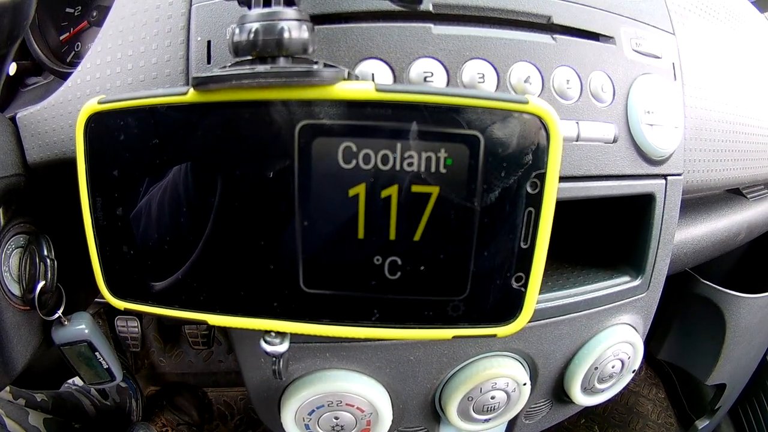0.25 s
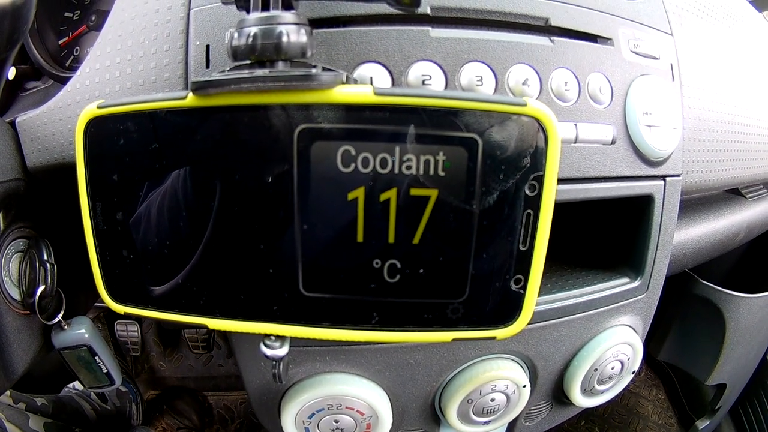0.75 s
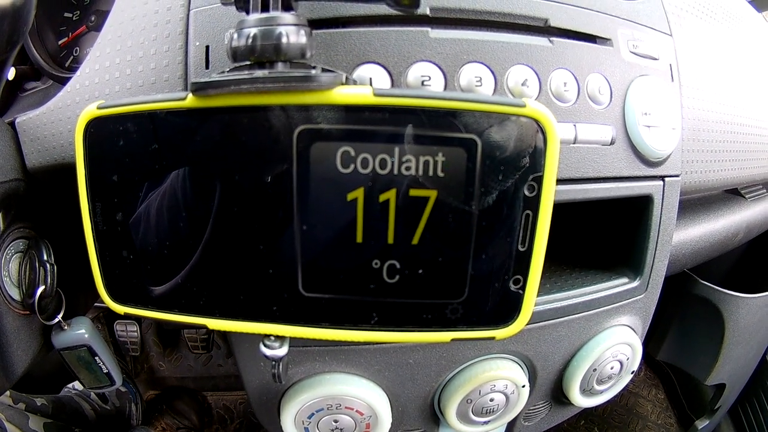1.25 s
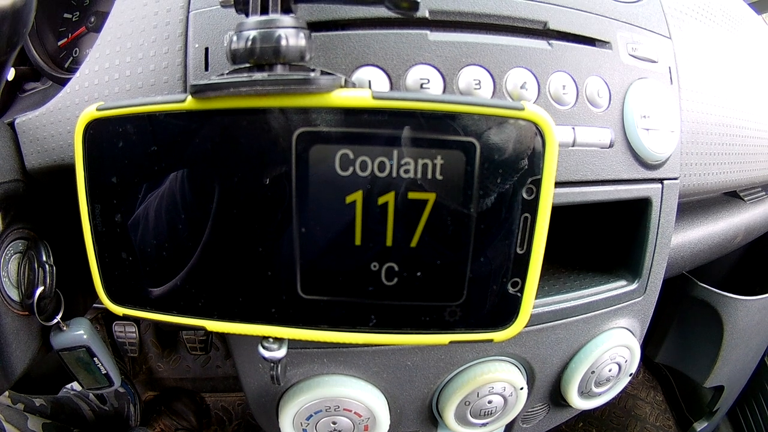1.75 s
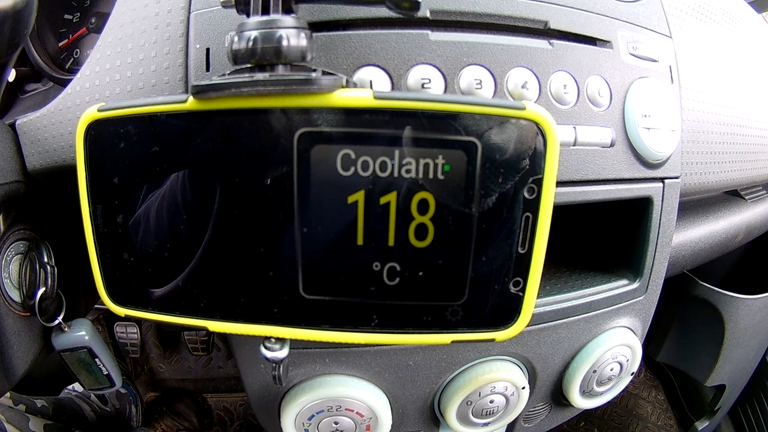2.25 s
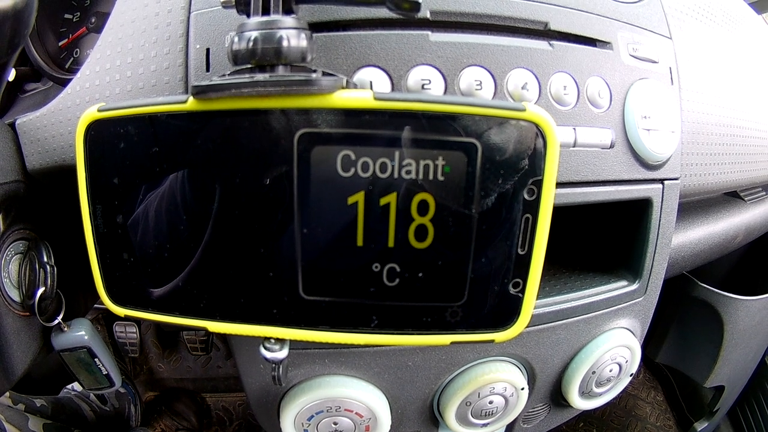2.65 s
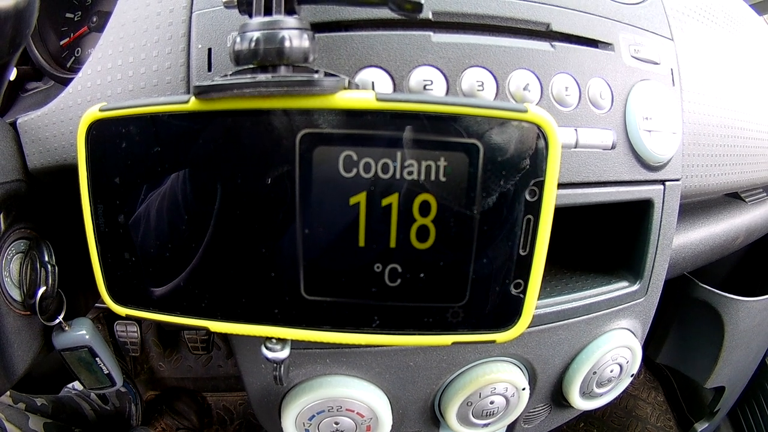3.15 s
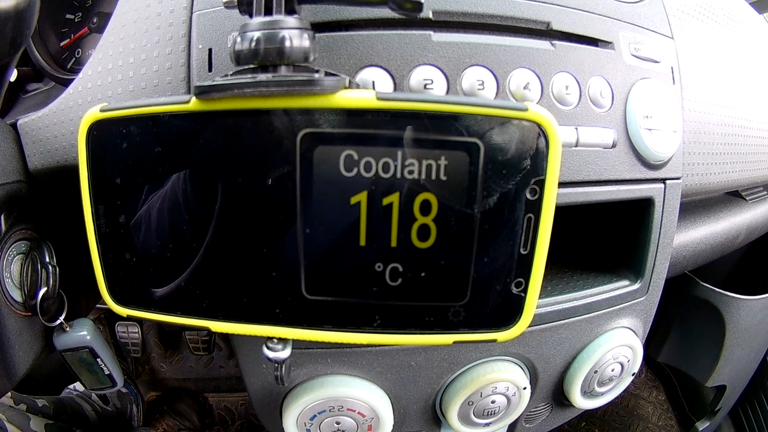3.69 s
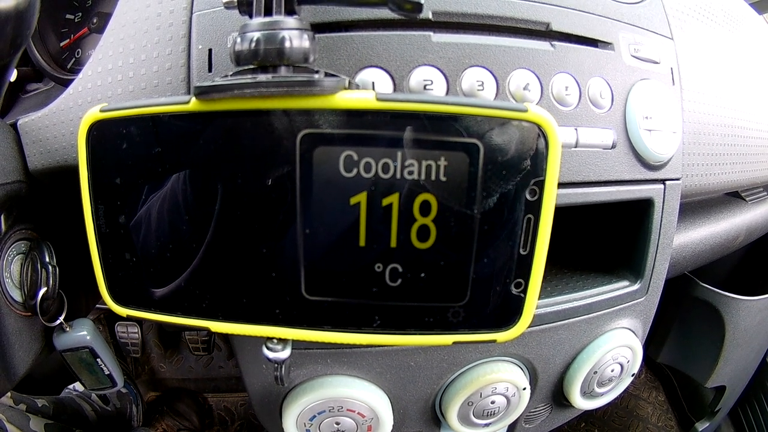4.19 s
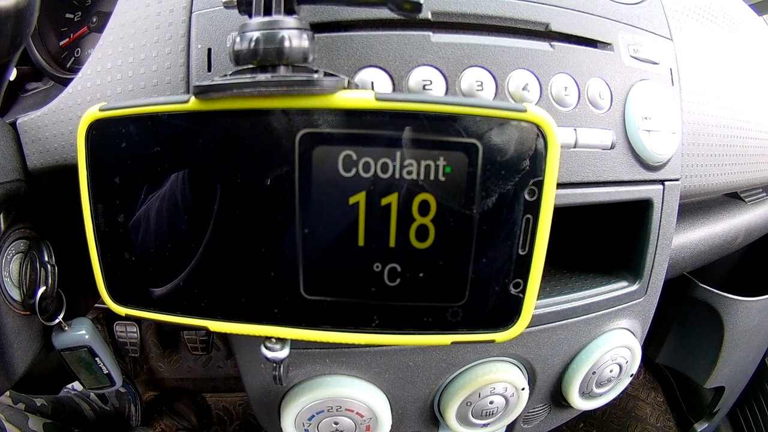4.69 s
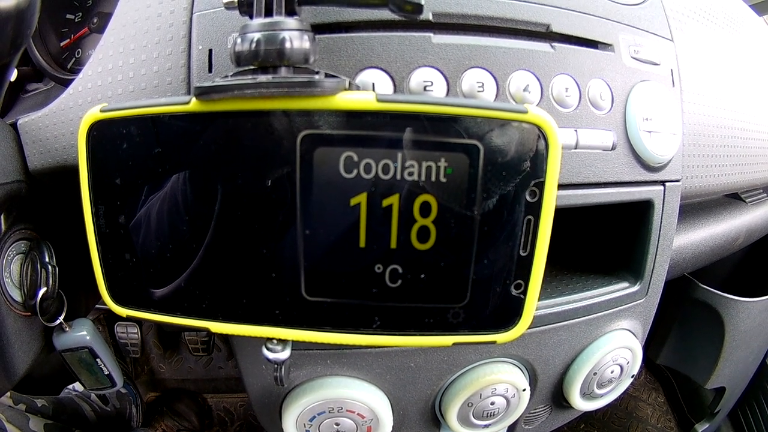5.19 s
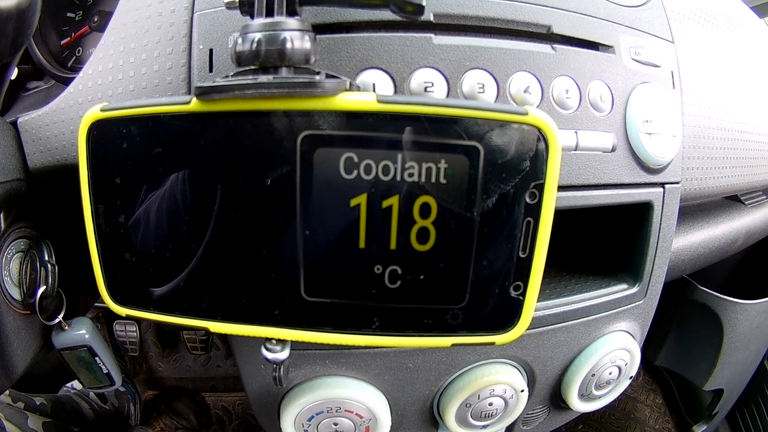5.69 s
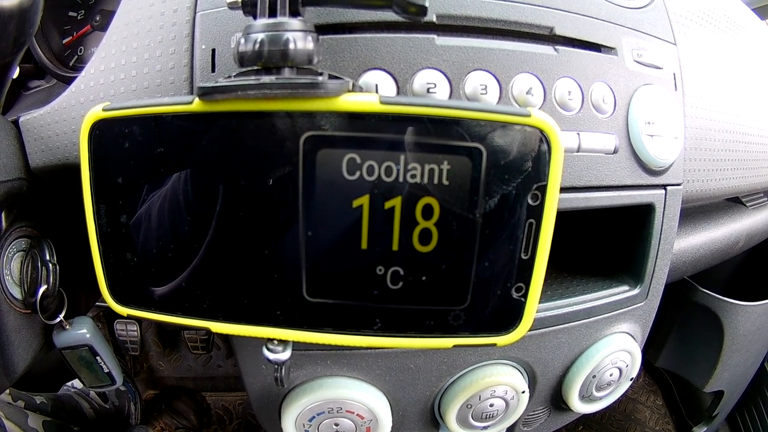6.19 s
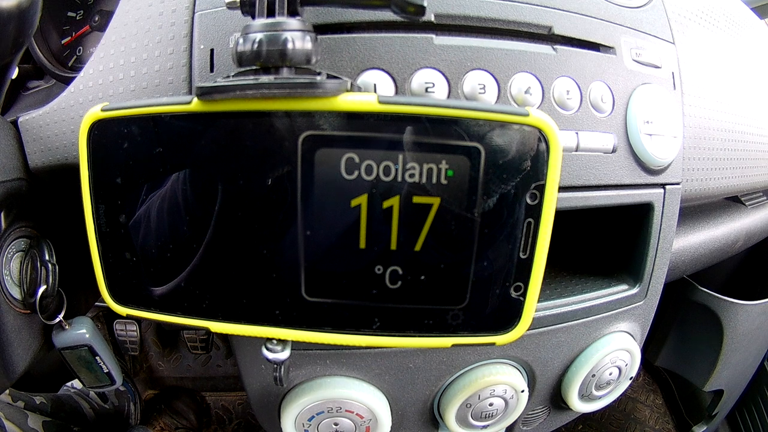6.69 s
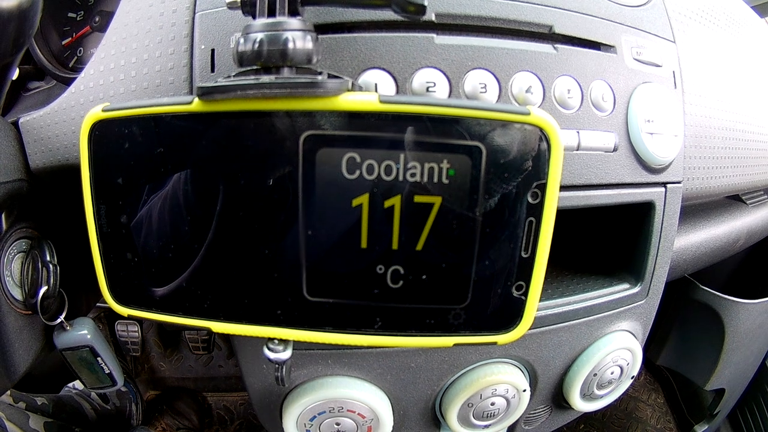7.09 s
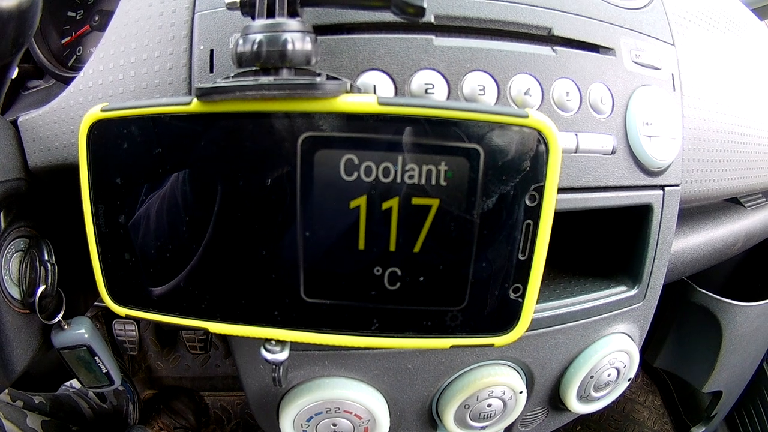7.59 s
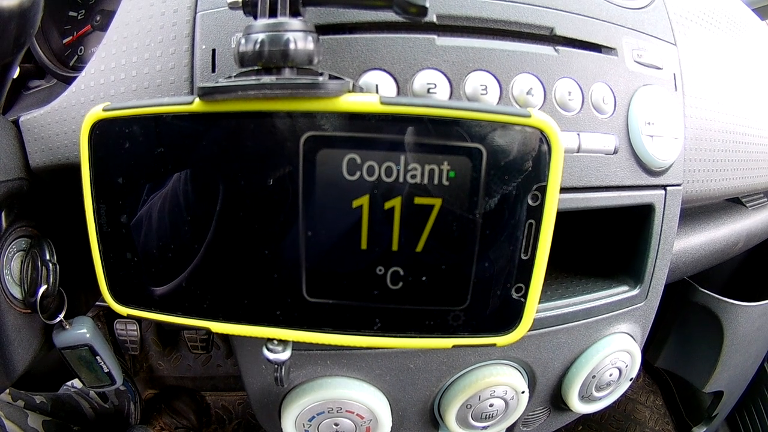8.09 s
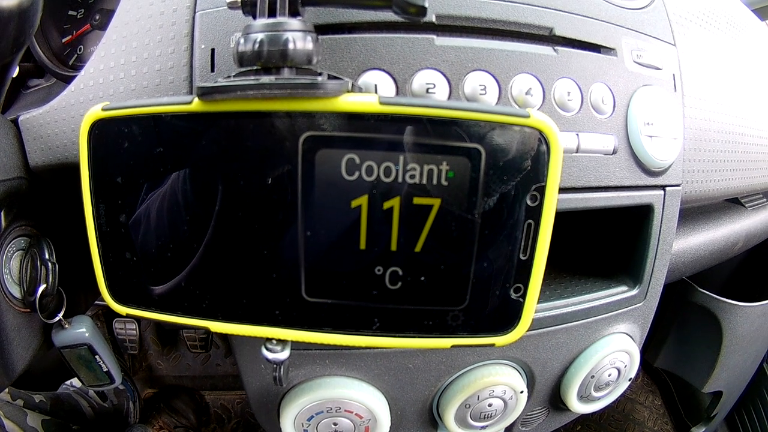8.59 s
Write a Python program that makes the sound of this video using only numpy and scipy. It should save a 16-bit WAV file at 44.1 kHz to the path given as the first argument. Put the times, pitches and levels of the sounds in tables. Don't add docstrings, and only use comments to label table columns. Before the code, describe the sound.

Inside a closed, parked car, the heater fan is already at full speed. Muffled air rushes steadily through ducts and vents over a strong, low, slightly wavering hum from the unbalanced fan wheel. Deep irregular buffeting trembles beneath, and the engine idles very faintly. The close dashboard microphone sounds dull and bassy, with a trace of high hiss. Nothing starts or stops until the abrupt end.

```python
import sys
import numpy as np
from scipy import signal
from scipy.fft import rfft, irfft, next_fast_len
from scipy.io import wavfile

SR = 44100
rng = np.random.default_rng(int(sys.argv[2]) if len(sys.argv) > 2 else 0)


def volts(x):
    e = np.asarray(x, float) / 20
    return 10 ** e


def to_wav(s):
    ch = np.atleast_2d(s).T
    pcm = np.round(np.clip(ch, -1, 1) * 32767)
    wavfile.write(sys.argv[1], SR, pcm.astype(np.int16))


N = 390285
TIME_S = np.arange(N) / SR


def rms_one(x):
    return x / np.sqrt(np.mean(x ** 2) + 1e-20)


def drift(rate_hz):
    knots = rng.standard_normal(600)
    return rms_one(np.interp(TIME_S * rate_hz, np.arange(len(knots)), knots))


def coloured(white, spectrum, modes=()):
    size = next_fast_len(N)
    hz = np.maximum(np.arange(size // 2 + 1) * SR / size, 1)
    points_hz, points_db = np.transpose(spectrum)
    level_db = np.interp(np.log(hz), np.log(points_hz), points_db)
    for centre_hz, width_hz, mode_db in modes:
        level_db += mode_db / (1 + (2 * (hz - centre_hz) / width_hz) ** 2)
    shaped = irfft(rfft(white, size) * volts(level_db), size)
    return rms_one(shaped[:N])


def microphone_hiss():
    # (frequency [Hz], level [dB per Hz])
    hiss_spectrum = [(3000, -30), (5500, -7.5), (6900, -0.5), (7900, -4), (8900, -1.5), (10000, -3),
                     (12000, -3.5), (13500, -2), (14500, -2), (15700, 0), (17000, 0.5)]
    return volts(-78) * coloured(rng.standard_normal(N), hiss_spectrum)


def engine():
    # (frequency [Hz], level [dB rms])
    idle_tones = [(25.2, -54), (48.3, -50)]
    angle = 2 * np.pi * np.cumsum(1 + 0.015 * drift(1.5)) / SR
    hum = np.zeros(N)
    for hz, level_db in idle_tones:
        strength = np.sqrt(2) * volts(level_db + 3 * drift(2.5))
        hum += strength * np.sin(hz * angle)
    return hum


def cabin_buffeting(load_db):
    # (frequency [Hz], level [dB per Hz])
    buffet_spectrum = [(12, -32), (20, -22), (28, -14), (41, -10), (48, -3), (55, -3.5), (61, 1), (70, -2),
                       (80, -9), (94, -12), (106, -22), (140, -40), (600, -140)]
    level_db = -34 + 1.05 * load_db
    return volts(level_db) * coloured(rng.standard_normal(N), buffet_spectrum)


def air_rush(load_db):
    # (frequency [Hz], level [dB per Hz])
    rush_spectrum = [(20, -11.5), (90, 0.5), (200, -4.5), (450, -3.5), (900, -12), (1500, -20), (2500, -29),
                     (3500, -36.5), (4500, -37.5), (5800, -48.5), (6500, -61.5), (7500, -75.5), (9000, -98),
                     (16000, -130)]
    # (centre [Hz], width [Hz], change [dB])
    duct_modes = [(114, 27, -3), (159.4, 51, 4.5), (204, 11, 3.5), (218, 22, -5), (237.4, 22, -5.5),
                  (267, 31, 6), (343.5, 70, -6.5), (429, 40, 3), (469, 50, 3), (540, 40, -1.5),
                  (580, 40, 2), (631, 50, -5.5), (723, 79, 4.5), (1056, 100, 3), (1125, 80, -4),
                  (1386, 53, -5), (1576, 120, 6), (1743, 74, -4.5), (1873, 43, 4.5), (2200, 70, 2.5),
                  (2420, 220, 4.5), (2705, 190, 5.5), (2813, 170, -4), (3065, 210, 5.5), (3240, 86, -2.5),
                  (3450, 120, -7.5), (3720, 130, 1), (4280, 150, 3), (4880, 220, -4), (4940, 150, 0.5),
                  (5460, 220, -1)]
    flicker_db = 0.16 * drift(9.7) + 0.35 * drift(40.0)
    turbulence = rng.standard_normal(N) * volts(flicker_db)
    level_db = -31 + 0.36 * load_db
    return volts(level_db) * coloured(turbulence, rush_spectrum, duct_modes)


def fan_wheel(load_db):
    # (multiple of the turn rate [-], level [dB])
    wheel_orders = [(1, 0), (2, -22), (5, -28)]
    mean_hz, hunt_hz, hunt_period_s, fastest_at_s = 73.95, 0.14, 7.0, 6.0
    hunt = np.cos(2 * np.pi * (TIME_S - fastest_at_s) / hunt_period_s)
    angle = 2 * np.pi * np.cumsum(mean_hz + hunt_hz * hunt) / SR
    hum = sum(volts(order_db) * np.cos(order * angle) for order, order_db in wheel_orders)
    level_db = -27.5 + load_db
    return -np.sqrt(2) * volts(level_db) * hum


def scene():
    # (time [s], level [dB])
    fan_load = [
        (0, -0.1),
        (2.5, 0.1),
        (6.3, 0.2),
        (8.85, -0.5),
    ]
    load_s, load_points_db = np.transpose(fan_load)
    load_db = np.interp(TIME_S, load_s, load_points_db)
    mix = engine() + cabin_buffeting(load_db) + air_rush(load_db) + fan_wheel(load_db)
    return mix[None]


def top_cut(x):
    return signal.sosfilt(signal.butter(12, 15750, fs=SR, output="sos"), x)


def record(dry):
    mix = dry + microphone_hiss()
    stop = np.minimum((N - np.arange(N)) / (0.002 * SR), 1)
    return top_cut(mix * stop)


dry = scene()
out = record(dry)
to_wav(out)
```